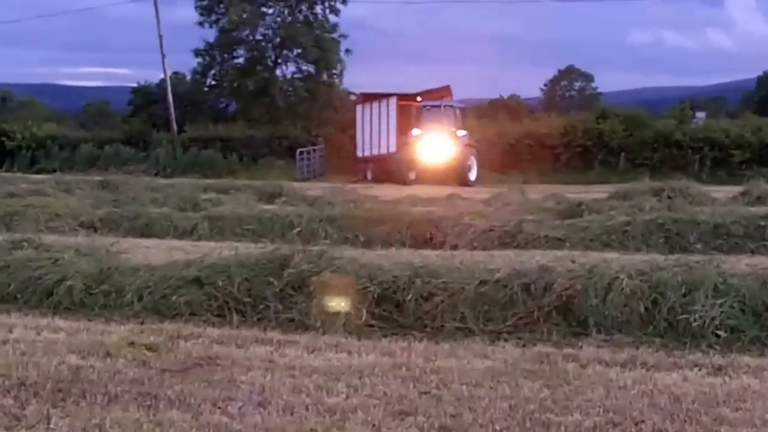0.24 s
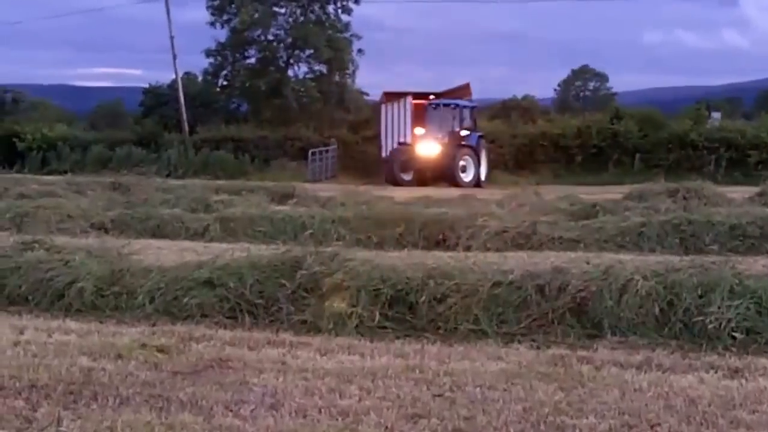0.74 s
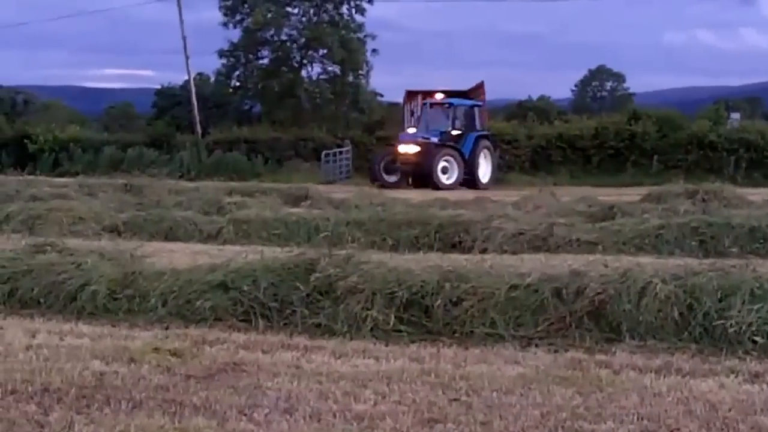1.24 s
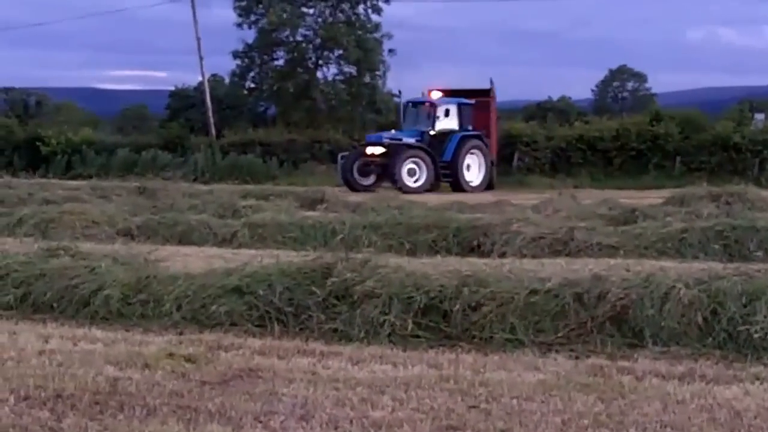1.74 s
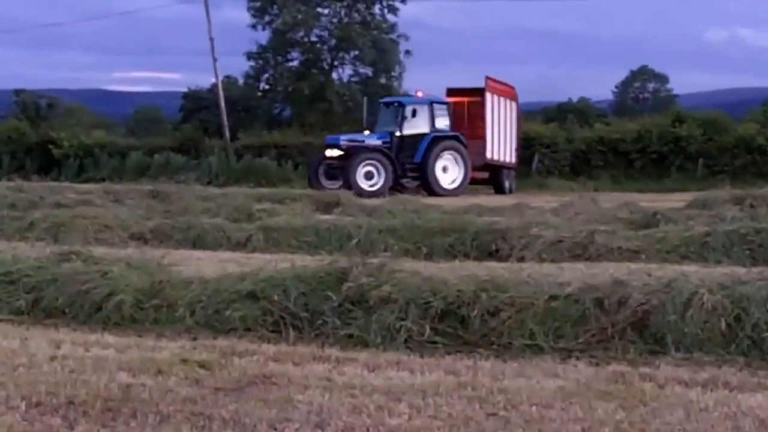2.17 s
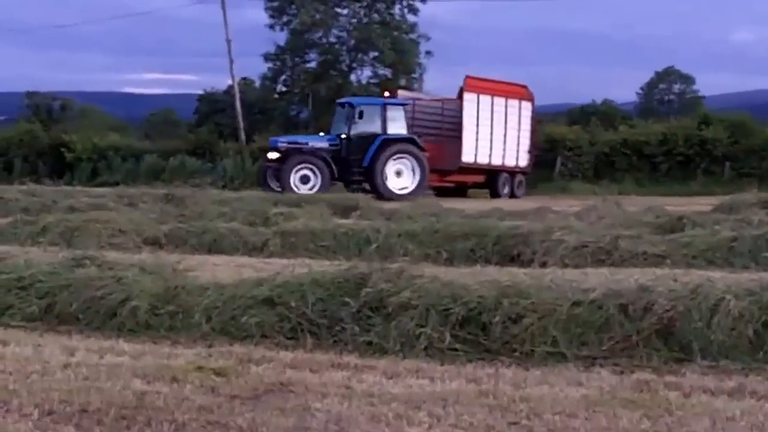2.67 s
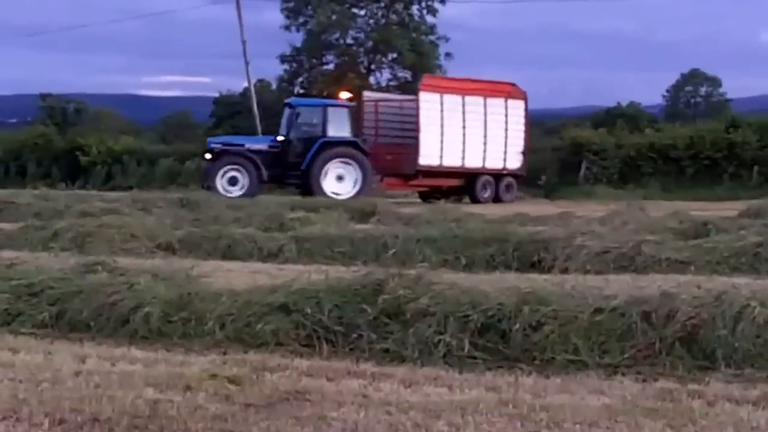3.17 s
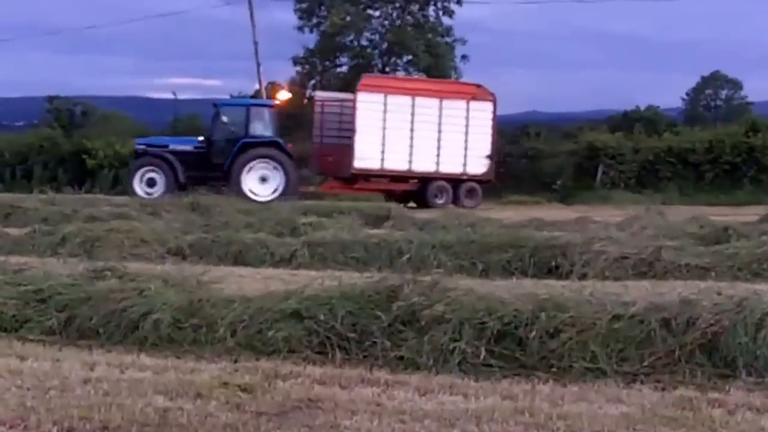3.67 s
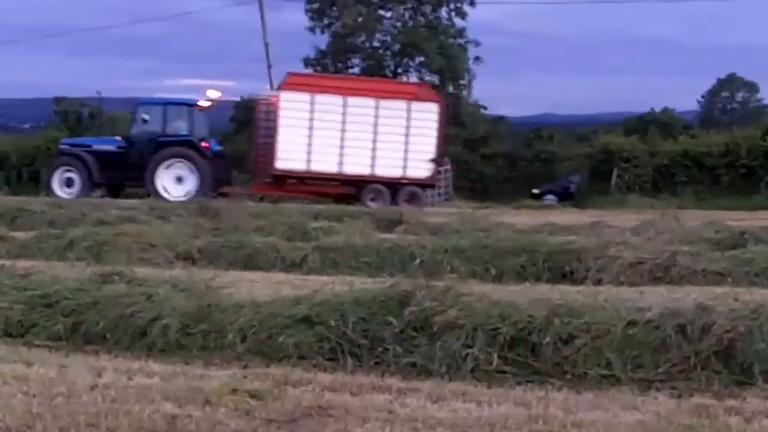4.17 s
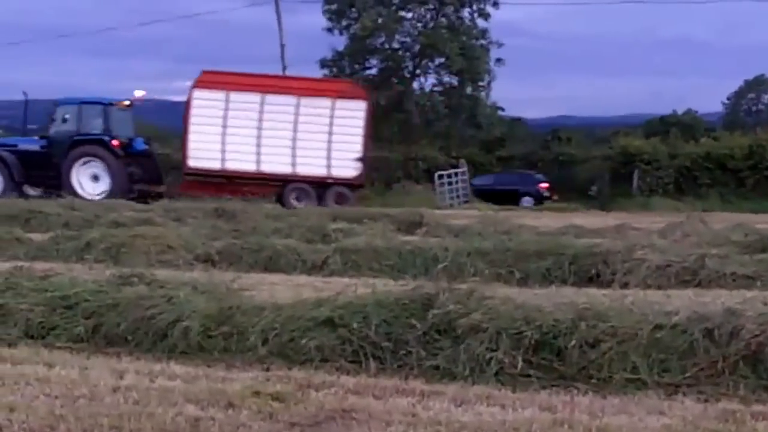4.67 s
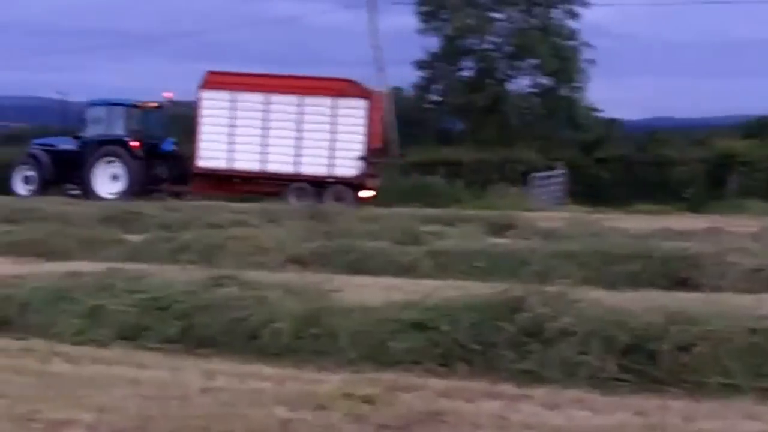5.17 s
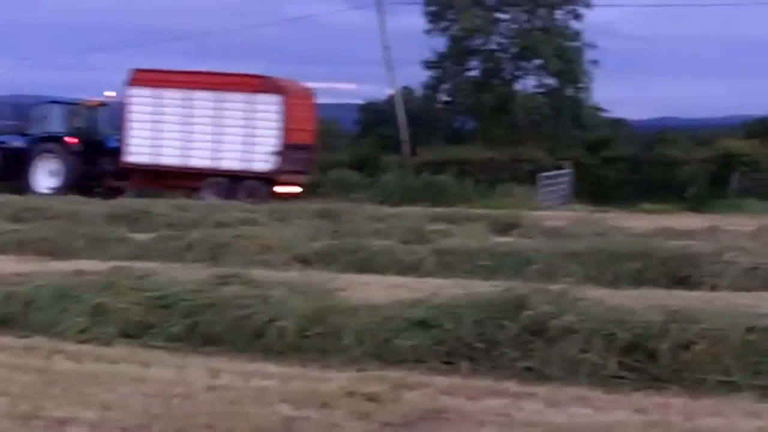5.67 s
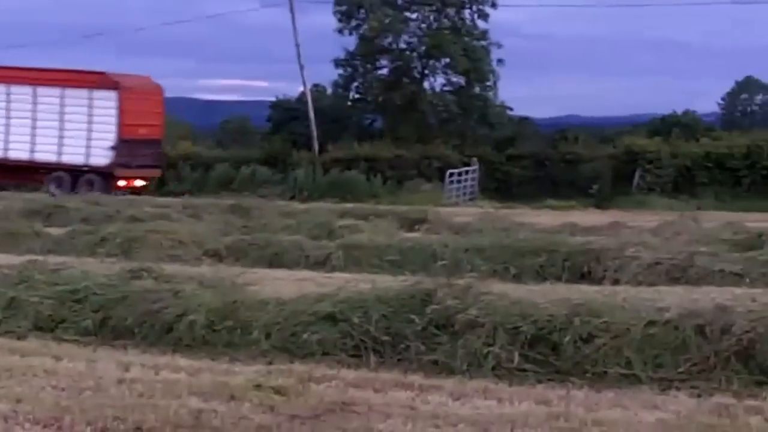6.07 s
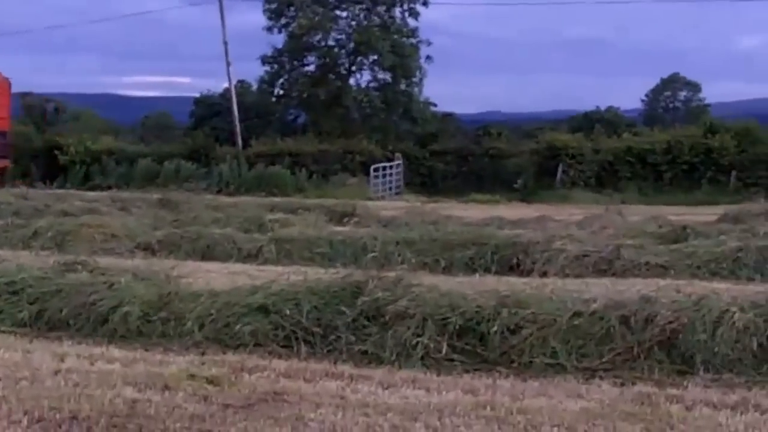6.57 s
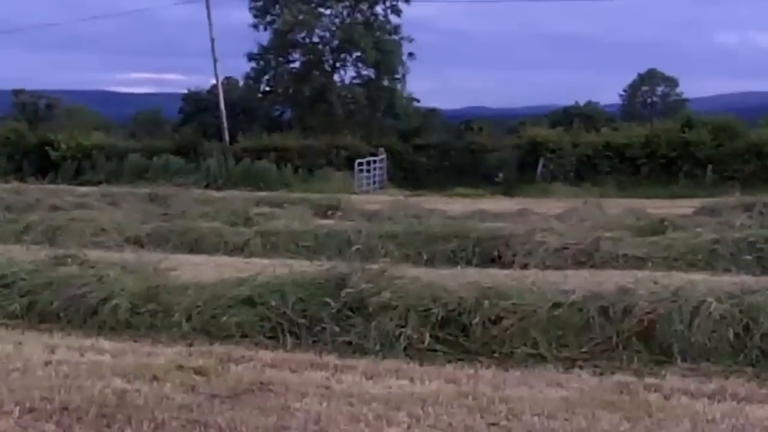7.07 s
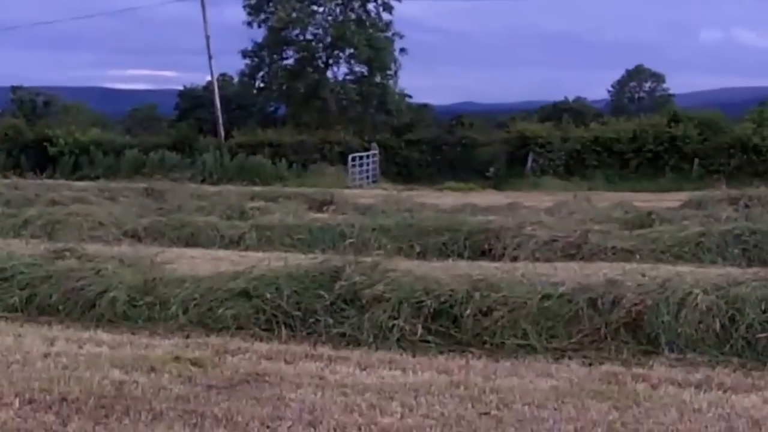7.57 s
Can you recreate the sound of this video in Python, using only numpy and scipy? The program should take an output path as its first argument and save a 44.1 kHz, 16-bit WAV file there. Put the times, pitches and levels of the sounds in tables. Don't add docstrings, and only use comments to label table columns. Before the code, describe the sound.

Outdoors in an open field, a diesel tractor pulls in with a low hum and ringing engine knock, turns and steadily speeds up. Its trailer clatters and pings early on, then bangs harder over ruts as it drives away. Wind thumps and rumbles on a nearly mono hand-held microphone, strongest around one to three seconds.

```python
import sys
import numpy as np
from scipy import signal
from scipy.fft import rfft, irfft, next_fast_len
from scipy.io import wavfile
from scipy.ndimage import map_coordinates

SR = 44100
rng = np.random.default_rng(int(sys.argv[2]) if len(sys.argv) > 2 else 0)


def ratio(d):
    e = np.asarray(d, float) / 20
    return 10 ** e


def bounce(signal):
    frames = np.transpose(np.atleast_2d(signal))
    limited = np.clip(frames, -1, 1)
    pcm = np.round(limited * 32767).astype(np.int16)
    wavfile.write(sys.argv[1], SR, pcm)


N = 345303
TIME = np.arange(N) / SR
FFT_SIZE = next_fast_len(N)

# time_s, firings_per_s
ENGINE_SPEED = [(0.0, 40.8), (0.4, 42.5), (0.8, 46.0), (1.2, 48.0), (1.6, 55.2), (2.0, 62.0), (2.4, 68.2),
                (2.8, 71.0), (3.2, 71.1), (3.7, 72.4), (4.2, 75.5), (4.7, 79.0), (5.2, 80.2), (5.7, 83.0),
                (6.2, 86.7), (6.8, 88.2), (7.3, 89.1), (7.83, 88.5)]
CYLINDER_KNOCK = [1, -.7, -.2, .7, -.8, 0]
# pitch_hz, width_hz, head_on_level_db, side_on_change_db, cylinder_unevenness_db
BLOCK_MODES = [
    (760, 60, 0, -2.5, 6.5),
    (1480, 95, -5, 5, 5),
    (2775, 92, -0.5, -1, -1.5),
    (3030, 133, 0.5, -4, 2),
    (3620, 70, -9, -3, 2),
    (4200, 130, -6, -2.5, 2),
    (5580, 660, -4.5, -12, -2),
    (6280, 1250, -14, 5, 11),
    (8100, 3300, -24.5, 3.5, 19),
]
# from_s, to_s
TURNING_S = [1.9, 2.7]
# time_s, pitch_ratio
BLOCK_PITCH = [(0, .965), (.9, .965), (1.4, 1.0), (1.75, 1.02), (2.2, 1.0), (2.45, .95), (2.8, .93)]
GLINT_PITCH_HZ = [3030, 3030, 3030, 3620, 3620, 2775, 2775, 4200, 4200, 4200, 1480, 1480, 1480, 3030, 760]
# middle_s, length_s, lift_db
FACE_GLINTS = [(0.12, 0.39, 12.5), (0.81, 0.33, 4), (1.16, 0.19, 0), (.15, .5, 8.5), (0.55, .6, 6),
               (2.5, .4, -0.5), (2.45, .5, 5), (1.4, 0.38, -4), (2, 0.33, 3), (2.36, 0.17, 8.5),
               (2.65, 0.27, 3), (3.11, 0.85, 13), (3.95, .4, 4), (1.38, 0.085, 9), (1.79, .3, 5.5)]
# time_s, first_order_level_db
EXHAUST_LEVEL = [(0, -25.5), (.4, -30.5), (.8, -25.5), (1.2, -33), (1.6, -26), (2.0, -35), (2.4, -26.5),
                 (2.75, -32.5), (3.0, -53), (3.3, -30.5), (3.8, -31), (4.5, -29.5), (5, -39), (5.4, -35),
                 (5.7, -38), (6.2, -40), (6.8, -70), (7.83, -47)]
# (middle_s, length_s, level_db)
PIPE_ORDERS = [
    (5 / 3, [(.3, 1.0, -37.5), (4.2, 0.56, -35)]),
    (2, [(1, 0.47, -33), (2, 0.5, -31), (2.55, .4, -44), (3.1, 0.71, -30), (3.6, 0.83, -43), (4.6, 0.82, -28), (5.1, 0.61, -49), (5.8, 0.83, -40)]),
    (7 / 3, [(4.1, 0.81, -37), (5.7, 2.7, -39.5)]),
    (5 / 2, [(2.5, .3, -38.5), (3.05, 0.86, -37), (4.1, 0.45, -35.5), (5.75, 0.63, -43.5)]),
    (3, [(2.45, 0.36, -40.5), (3.1, 1, -43), (4.5, .8, -42), (5.5, 0.33, -45.5)]),
]
# time_s, running_gear_level_db, block_level_db
PASSING_LEVELS = [(0, -38, -54), (.3, -40.5, -46.5), (.74, -38, -43.5), (1.25, -40, -39.5),
                  (1.62, -36, -34.5), (2.15, -37.5, -38.5), (2.6, -35, -40), (3, -36.5, -51.5),
                  (3.7, -35, -43), (4.21, -34.5, -41), (4.75, -36, -40), (5.1, -37.5, -46.5),
                  (5.7, -36, -42), (6.35, -36.5, -62), (6.76, -41, -65), (7.26, -41.5, -58),
                  (7.83, -43.5, -64)]
# pitch_hz, density_db (dB per Hz)
CLATTER_COLOUR = [(380, -12.5), (500, -12), (620, -3), (780, 2), (1030, -4), (1400, 1), (2000, -1),
                  (3000, -3.5), (3700, -7.5), (4400, -8.5), (6400, -16.5), (8200, -28), (10500, -39),
                  (14500, -58)]
BLOCK_SHINE, SHINE_DB, MASKED_DB = 0.26, 4.5, [-1.5, -3]
LEAVING_S, NEAR_BOOM_DB, FAR_BOOM_DB = [5.6, 6.2], -0.5, 3
# start_s, end_s, start_pitch_hz, end_pitch_hz, level_db
GEAR_WHINES = [
    (5.9, 6.4, 2240, 2260, -58),
    (7.14, 7.6, 2140, 2125, -48.5),
    (6.6, 7.4, 2880, 2830, -57),
    (0.0, 1.0, 7550, 7550, -70),
]
# time_s, level_db
GUST_LEVEL = [(0.0, -30.5), (0.04, -48), (0.83, -44), (0.91, -36), (1.28, -31), (1.33, -29), (1.42, -40.5),
              (1.59, -38), (1.68, -30.5), (1.74, -36), (2.07, -35.5), (2.09, -38), (3.79, -38), (6.43, -36),
              (7.54, -38), (7.59, -31), (7.79, -35), (7.83, -28.5)]
# pitch_hz, density_db (dB per Hz)
RUMBLE_COLOUR = [(10, -38), (25, 6.5), (45, 6.5), (90, -1.5), (150, -2.5), (220, -6), (300, -17.5),
                 (450, -37), (700, -69)]
RUMBLE_DB, RUMBLE_FOLLOWS, EDDY_DB, EDDY_FOLLOWS, CALM_DB = -27.5, 0.68, -45, 1.73, -37
# middle_s, level_db, length_s
WIND_BUFFETS = [(0.54, -28, 0.075), (0.893, -35, 0.14), (1.135, -34, 0.028), (1.433, -19, 0.084),
                (1.64, -15, 0.17), (1.86, -9, 0.038), (1.96, -10.5, 0.071), (2.105, -14, 0.063),
                (2.22, -16.5, 0.074), (2.545, -20, 0.055), (2.78, -21, 0.12), (2.9, -12, 0.031),
                (2.991, -13.5, 0.042), (4.493, -22, 0.11), (4.71, -18, 0.074), (4.837, -14, 0.11),
                (5.157, -12.5, 0.051), (5.295, -15.5, 0.059), (5.735, -7, 0.086), (6.1, -20.5, 0.12),
                (6.43, -21, 0.03), (6.567, -14, 0.046), (6.846, -15, 0.041), (7.283, -21, 0.082),
                (7.45, -29, 0.03), (7.594, -18, 0.17), (7.734, -25, 0.12)]
# time_s, level_db
LULL_S, LULL_LOWS_DB = [0.8, 1.0, 3.1, 3.4, 4.2, 4.6, 5.9, 6.4], [-6, -3, -3, -8, -7, -3, -2, -8]
# crest_s, peak_level_db, upper_edge_hz (sharpness)
EDDY_POPS = [(.904, -13, 170), (.928, -19, 260), (1.012, -9, 190), (1.031, -11, 150), (.99, -19, 280),
             (1.065, -19, 200), (1.144, -20, 280), (1.089, -15, 470), (1.126, -11, 120), (1.162, -9, 210),
             (1.211, -10, 180), (1.333, -13, 280), (1.348, -14, 170), (1.374, -16, 300), (1.637, -10, 170),
             (1.682, -11, 260), (1.706, -16, 200), (1.966, -6, 150), (2.018, -11, 180), (2.058, -14, 240),
             (2.135, -13, 130), (2.145, -19, 300), (1.982, -19, 280), (2.076, -20, 300), (2.201, -21, 280),
             (2.244, -20, 260), (2.275, -19, 280), (2.302, -21, 280), (5.04, -19, 180), (6.41, -17, 150),
             (6.43, -15, 120), (7.13, -24, 260), (7.2, -24, 250), (7.459, -15, 150), (7.586, -16, 170),
             (7.622, -9, 110), (7.757, -12, 110), (7.655, -19, 220), (7.725, -13, 200)]
PULLING_EDDIES = (.904, 1.031, 1.089, 1.966)
# start_s, peak_level_db, treble_against_peak_db, t60_s
RUT_BANGS = [(0.394, -32, -28, 0.78), (0.479, -42, -19, 0.13), (0.629, -37, -2, 0.47),
             (0.949, -33, 5, 0.19), (1.209, -32, 10, 0.14), (1.3, -36, 10, 0.13), (1.42, -40, 5, 0.082),
             (1.599, -28, -3, 0.29), (3.374, -25.5, -61, 0.34), (3.862, -16, -29, 0.076),
             (3.6, -37, 3, 0.17), (3.901, -35, 8, .1), (4.039, -31, -24, 0.74), (4.15, -41, 7, .1),
             (4.109, -23, -36, 0.13), (4.199, -26, -31, 0.19), (4.373, -7, -30, 0.065),
             (4.709, -24, -10, 0.26), (5.297, -33, -30, 0.44), (5.899, -24, 5, 0.093),
             (6.099, -50, -36, 0.76), (6.41, -14, -16, 0.19), (6.476, -19, -13, 0.37),
             (6.619, -18.5, -6, 0.08), (6.892, -23.5, 3, 0.17), (6.963, -13, -22, 0.2),
             (7.071, -22.5, -18, 0.19), (7.119, -21, -28, 0.14), (7.162, -26, -7, 0.25),
             (7.249, -20, -10, 0.087), (7.526, -18.5, -17.5, 0.56), (7.682, -24, -38, 0.17)]
# pitch_hz, width_hz, level_db
TRAILER_SIDES = [
    (684, 54, -4.5),
    (860, 220, 0),
    (907, 13, 2),
    (1214, 21, 0),
    (1660, 45, 2),
    (1850, 240, -6.5),
]
# start_s, pitch_hz, level_db, t60_s
LOOSE_PINGS = [(.405, 1690, -46, .2), (.535, 1700, -33.5, 0.2), (.545, 2320, -43, .4),
               (.62, 1476, -34, 0.11), (.64, 2330, -44, 0.38), (.66, 1700, -56, 0.22),
               (.755, 1430, -42, .12), (0.856, 1780, -41, 0.13), (0.864, 1726, -39.5, .3),
               (0.929, 1680, -43, .3), (.99, 2660, -44, .25), (1.135, 2700, -40, .12),
               (6.425, 1850, -38, .2), (6.47, 2220, -42, .3), (6.475, 894, -36, .3), (6.975, 932, -32, 0.2),
               (6.976, 1920, -45, 0.13), (7.12, 672, -40, .2), (7.545, 795, -37, 0.3),
               (7.67, 767, -43, 0.21), (7.76, 2960, -53, 0.19)]
# middle_s, length_s, level_db
GRILLE_SWELLS = [
    (1.35, .2, -66),
    (1.7, 0.43, -66.5),
    (3.9, 1, -69),
    (4.6, .5, -71),
    (5.6, 0.85, -74),
]
CHANNEL_OFFSET = [
    [.0353],
    [-.0051],
]


def rms_one(x):
    return x / np.sqrt(np.mean(x ** 2) + 1e-20)


def in_time(rows):
    s, *columns = np.transpose(rows)
    return [np.interp(TIME, s, column) for column in columns]


def at_hz(points, hz):
    pitches, values = np.array(points).T
    return np.interp(np.log(hz), np.log(pitches), values)


def drift(rate_hz):
    r = np.exp(-80 * np.pi * rate_hz / SR)
    slow = signal.lfilter([1], [1, -2 * r, r * r], rng.standard_normal(N // 40 + 2002))[2000:]
    return np.interp(np.arange(N) / 40, np.arange(len(slow)), rms_one(slow))


def bell(middle_s, length_s):
    return np.exp(-4 * np.log(2) * ((TIME - middle_s) / length_s) ** 2)


def swells(rows):
    return sum(ratio(db) * bell(s, length) for s, length, db in rows)


def resonance(x, hz, width_hz):
    r = np.exp(-np.pi * width_hz / SR)
    poles = [1, -2 * r * np.cos(2 * np.pi * hz / SR), r * r]
    return signal.lfilter(np.array([1, 0, -1]) * (1 - r * r) / 2, poles, x)


def double_resonance(x, hz, width_hz):
    return resonance(resonance(x, hz, width_hz), hz, width_hz)


def butter(x, order, edge_hz, kind="low"):
    return signal.sosfilt(signal.butter(order, edge_hz, kind, fs=SR, output="sos"), x)


def bands(tone, count):
    low, high = tone[0][0], tone[-1][0]
    hz = np.maximum(np.arange(FFT_SIZE // 2 + 1) * SR / FFT_SIZE, 1)
    inside = (hz > low) & (hz < high)
    spectrum = rfft(rng.standard_normal(FFT_SIZE)) * ratio(at_hz(tone, hz)) * inside
    spectrum = spectrum * FFT_SIZE / np.sqrt(2 * np.sum(np.abs(spectrum) ** 2))
    place = np.log(hz / low) / np.log(high / low) * (count - 1)
    for k, centre in enumerate(np.geomspace(low, high, count)):
        share = np.clip(1 - np.abs(place - k), 0, 1)
        yield centre, irfft(spectrum * share, FFT_SIZE)[:N]


def exhaust(firings):
    orders = [(0.99, ratio(in_time(EXHAUST_LEVEL)[0]))]
    orders += [(multiple, swells(rows)) for multiple, rows in PIPE_ORDERS]
    hum = 0
    for multiple, gain in orders:
        breath = ratio(.7 * drift(4))
        hum = hum + np.sqrt(2) * gain * breath * np.sin(2 * np.pi * (multiple * firings + rng.random()))
    return hum


def knock(firings, block_db, decay_s=0.0094):
    own_time = np.cumsum(in_time(BLOCK_PITCH)[0])
    firing = np.interp(np.arange(N), own_time, firings).astype(int)
    since = TIME - TIME[np.searchsorted(firing, firing)]
    blow = np.exp(-since / decay_s) * rng.standard_normal(N) + 34 * (since == 0)
    side_on = np.interp(TIME, TURNING_S, [0, 1])
    ringing = 0
    for k, (hz, width_hz, db, side_db, uneven_db) in enumerate(BLOCK_MODES):
        cylinder_db = uneven_db * np.array(CYLINDER_KNOCK)[(firing + k) % 6]
        chance_db = 1.4 * rng.standard_normal(firing[-1] + 1)[firing]
        rung = double_resonance(ratio(cylinder_db + chance_db) * blow, hz, 1.6 * width_hz)
        glint_db = sum(lift_db * bell(s, length)
                       for face_hz, (s, length, lift_db) in zip(GLINT_PITCH_HZ, FACE_GLINTS) if face_hz == hz)
        ringing = ringing + ratio(db + side_db * side_on + glint_db) * rms_one(rung)
    return ratio(block_db - 9) * map_coordinates(ringing, [own_time], order=3, mode="nearest")


def clatter(gear_db, block_db):
    boom_db = np.interp(TIME, LEAVING_S, [NEAR_BOOM_DB, FAR_BOOM_DB])
    middle_db = np.interp(TIME, TURNING_S, MASKED_DB)
    treble_db = SHINE_DB + BLOCK_SHINE * (block_db - gear_db)
    shake = drift(7.2)
    metal = 0
    for hz, band in bands(CLATTER_COLOUR, count=14):
        lift_db = at_hz([(900, 1), (1300, 0)], hz) * boom_db
        lift_db = lift_db + at_hz([(2000, 0), (3500, 1), (8000, 0)], hz) * middle_db
        lift_db = lift_db + at_hz([(3500, 0), (8000, 1)], hz) * treble_db
        rattle_db = 0.73 * shake + 1.83 * drift(57)
        metal = metal + band * (ratio(gear_db + lift_db + rattle_db) + bang_gain(hz))
    return metal


def clank():
    ring = double_resonance(rng.standard_normal(N), 2220, 1500)
    level_db, t60_s = -33.5, 0.33
    return ratio(level_db - 60 * np.minimum(TIME / t60_s, 3)) * rms_one(ring)


def whines():
    tones, waver, swell_db = 0, 1 + .002 * drift(15), 2.5 * drift(12)
    for start, end, start_hz, end_hz, db in GEAR_WHINES:
        fade = np.clip(np.minimum(TIME - start, end - TIME) / .08, 0, 1)
        hz = np.interp(TIME, [start, end], [start_hz, end_hz]) * waver
        tones = tones + np.sqrt(2) * ratio(db + swell_db) * fade * np.sin(2 * np.pi * np.cumsum(hz) / SR)
    return tones


def wind():
    gust_db = in_time(GUST_LEVEL)[0] - CALM_DB
    steady = ratio(RUMBLE_DB + RUMBLE_FOLLOWS * gust_db)
    buffets = swells([(s, 1.29 * length, db + 0.5) for s, db, length in WIND_BUFFETS])
    lull_db = np.interp(TIME, LULL_S, LULL_LOWS_DB)
    rumble = 0
    for hz, band in bands(RUMBLE_COLOUR, count=9):
        deep = at_hz([(60, 0.41), (110, 0.007)], hz)
        rumble = rumble + band * ratio(1.8 * drift(2.6)) * (steady * ratio(lull_db * deep) + deep * buffets)
    sizes = ratio(3 * np.minimum(rng.exponential(1, N), 3)) * rng.choice([-1, 1], N)
    eddies = butter((rng.random(N) < 260 / SR) * sizes + 1e-18, 3, [90, 300], "band")
    out = rumble + ratio(EDDY_DB + EDDY_FOLLOWS * gust_db) * rms_one(eddies)
    for s, db, hz in EDDY_POPS:
        cycle = np.arange(round(12 / 5 * SR / hz)) * hz / SR - 6 / 5
        pulse = (1 - 9 * cycle ** 2) * np.exp(-4.5 * cycle ** 2)
        start = round(s * SR) - len(cycle) // 2
        out[start:start + len(cycle)] += ratio(db - 1) * (-1 if s in PULLING_EDDIES else 1) * pulse
    return out


def bang_gain(hz):
    gain = np.zeros(N)
    air_db = at_hz([(7500, 0), (13000, -10)], hz)
    treble_share = at_hz([(3500, 0), (8000, 1)], hz)
    for s, db, treble_db, t60 in RUT_BANGS:
        span = slice(round(s * SR), round((s + t60) * SR))
        after = TIME[span] - s
        swell = 1 - np.exp(-(after / .012) ** 2)
        decay = ratio(-60 * after / t60 * (hz / 1500) ** .35)
        gain[span] += ratio(db - 14 + treble_share * (treble_db + 21) + air_db) * swell * decay
    return gain


def trailer_sides():
    blows = butter(bang_gain(890) * rng.standard_normal(N) + 1e-18, 2, 2500)
    return ratio(15.5) * sum(ratio(db) * resonance(blows, hz, width_hz) for hz, width_hz, db in TRAILER_SIDES)


def pings():
    out = np.zeros(N)
    rise_s = 0.0044
    for s, hz, db, t60 in LOOSE_PINGS:
        span = slice(round(s * SR), round((s + t60) * SR))
        after = TIME[span] - s
        envelope = ratio(db + 4 - 60 * after / t60) * (1 - np.exp(-after / rise_s))
        out[span] += envelope * np.sin(2 * np.pi * hz * after)
    return out


def fan():
    air = double_resonance(rng.standard_normal(N), 10360, 3700)
    return swells(GRILLE_SWELLS) * ratio(4.1 * drift(25)) * rms_one(air)


def scene():
    firings = np.cumsum(in_time(ENGINE_SPEED)[0] * (1 + .002 * drift(4))) / SR
    gear_db, block_db = in_time(PASSING_LEVELS)
    tractor = exhaust(firings) + knock(firings, block_db) + whines() + fan()
    metal = clatter(gear_db, block_db) + clank() + trailer_sides() + pings()
    mono = tractor + metal + wind()
    return np.array([mono, mono])


def low_pass(x):
    return signal.sosfilt(signal.butter(12, 15130, fs=SR, output="sos"), x)


def record(dry):
    notch_hz, width_hz, left = 5480, 830, 0.045
    w, r = 2 * np.pi * notch_hz / SR, np.exp(-np.pi * width_hz / SR)
    zero = np.exp(-np.pi * width_hz * left / SR)
    zeros, poles = [1, -2 * zero * np.cos(w), zero ** 2], [1, -2 * r * np.cos(w), r * r]
    x = signal.lfilter(zeros, poles, dry) * (1 + r) / (1 + zero)
    x = x + ratio(-75) * rms_one(resonance(rng.standard_normal(N), 12500, 4000))
    white = rng.standard_normal((2, 2, N))
    flicker = ratio(-53) * rms_one(butter(white[0], 2, [8, 30], "band"))
    murmur = ratio(-65) * rms_one(double_resonance(white[1], 110, 220))
    hiss = ratio(-74 + 3.3 * drift(8)) * rms_one(double_resonance(white[1], 12800, 5500))
    x = butter(1.2 * np.tanh(x / 1.2) + hiss, 3, 12600)
    flutter = ratio(-83 + 5.5 * drift(9)) * rms_one(double_resonance(rng.standard_normal(N), 14500, 1500))
    return low_pass(x + flutter + flicker + murmur + CHANNEL_OFFSET)


dry = scene()
out = record(dry)
bounce(out)
```